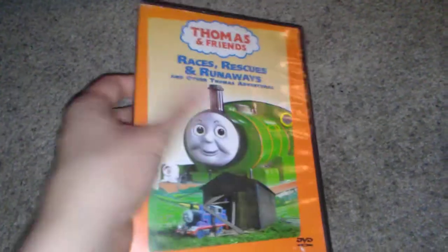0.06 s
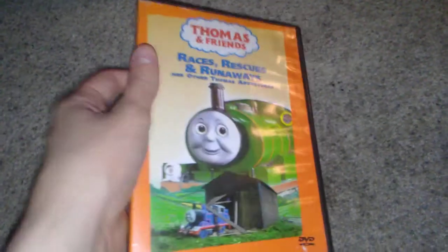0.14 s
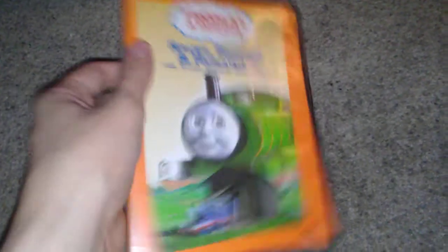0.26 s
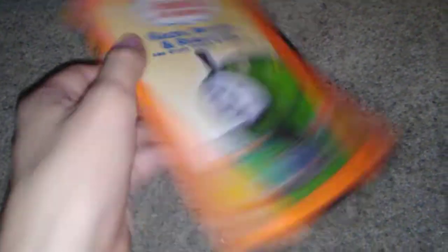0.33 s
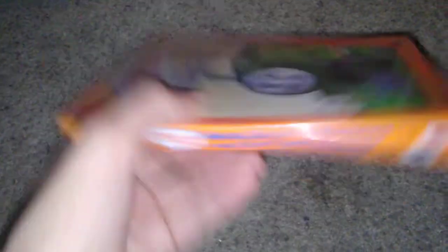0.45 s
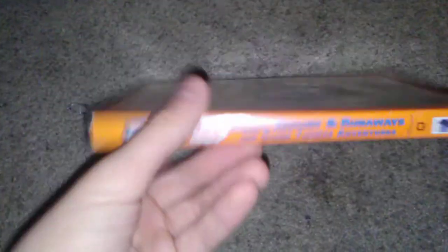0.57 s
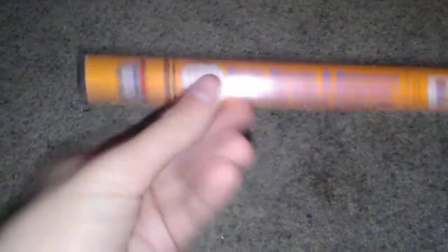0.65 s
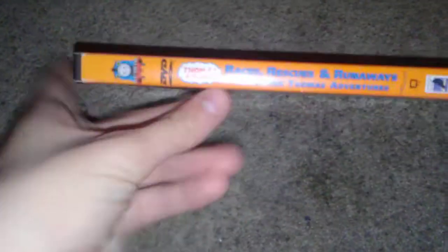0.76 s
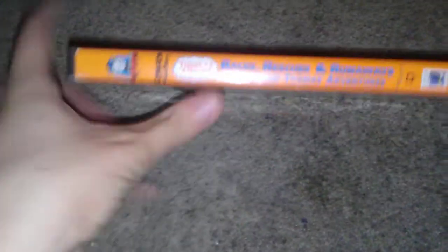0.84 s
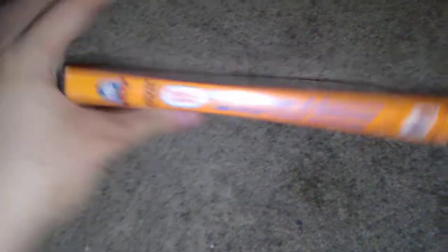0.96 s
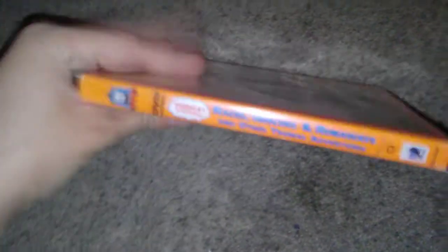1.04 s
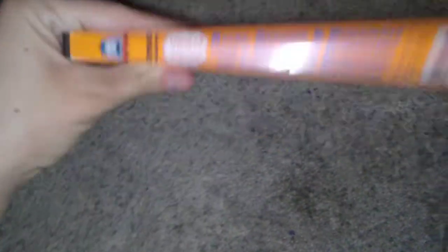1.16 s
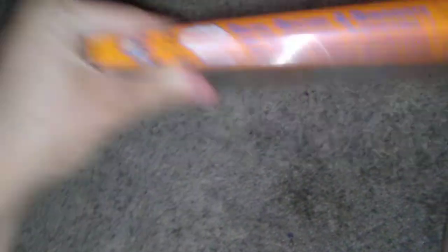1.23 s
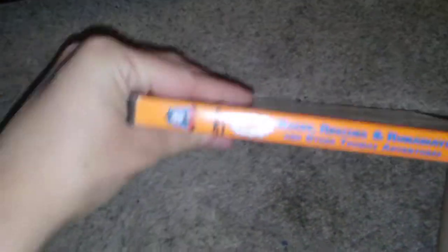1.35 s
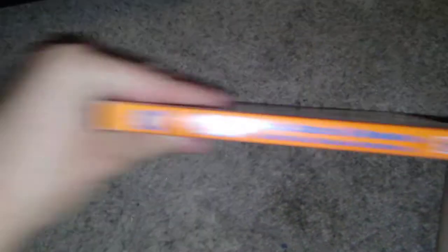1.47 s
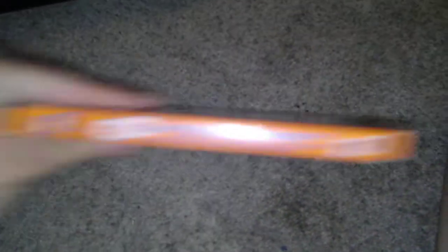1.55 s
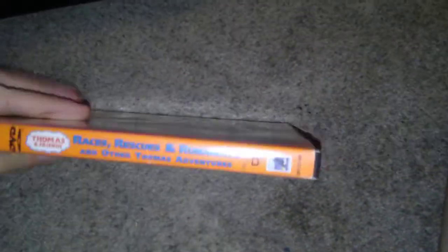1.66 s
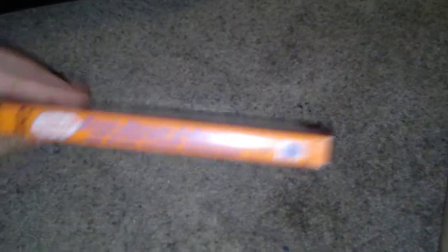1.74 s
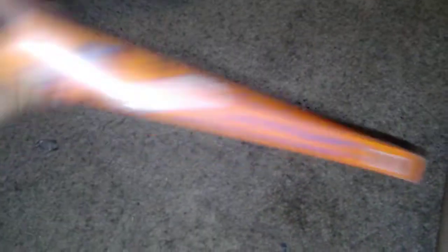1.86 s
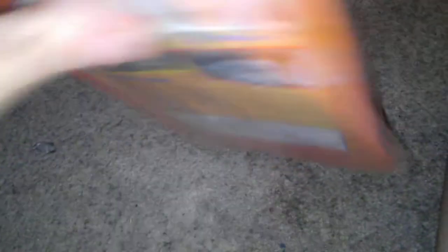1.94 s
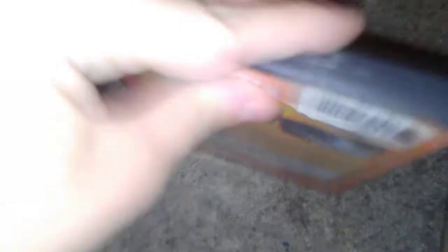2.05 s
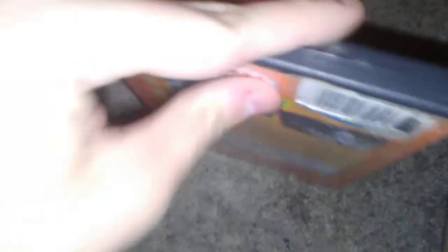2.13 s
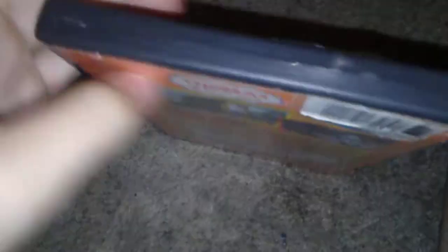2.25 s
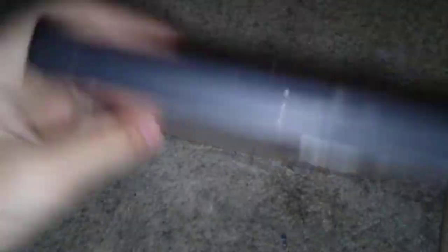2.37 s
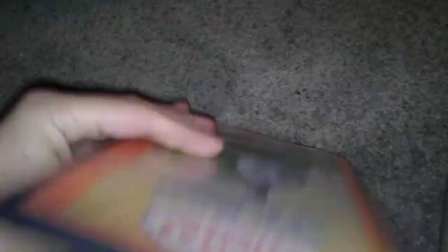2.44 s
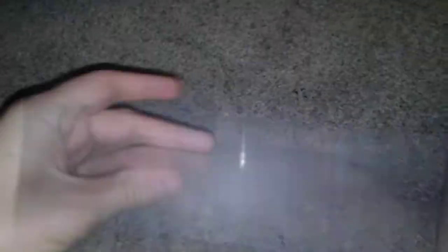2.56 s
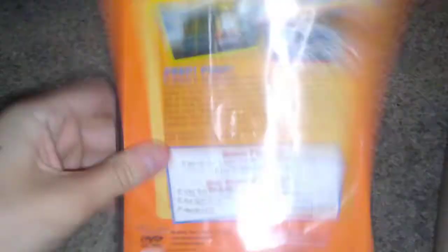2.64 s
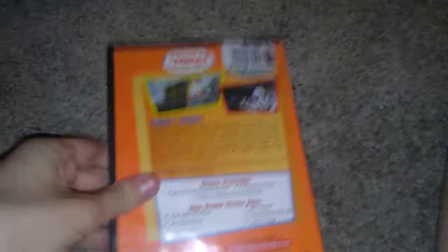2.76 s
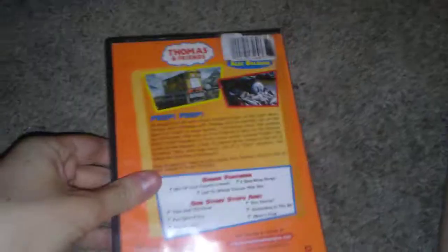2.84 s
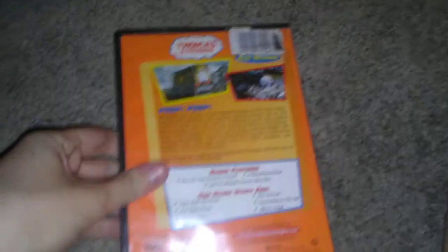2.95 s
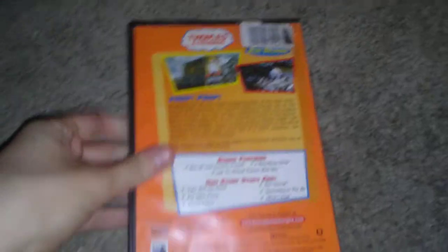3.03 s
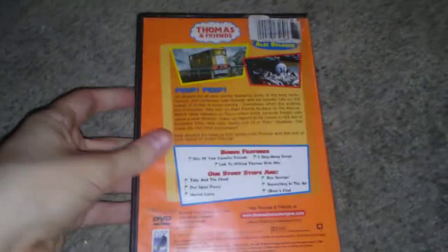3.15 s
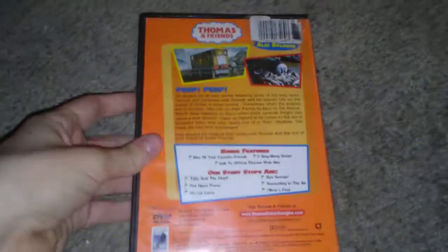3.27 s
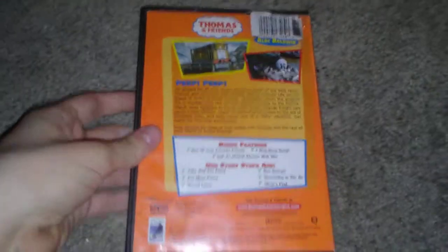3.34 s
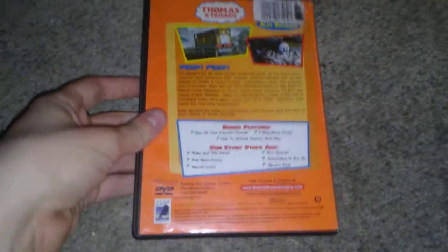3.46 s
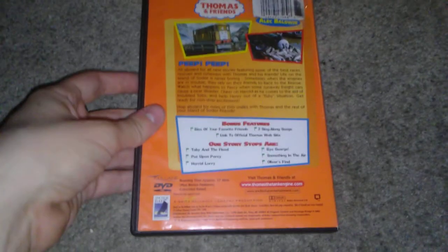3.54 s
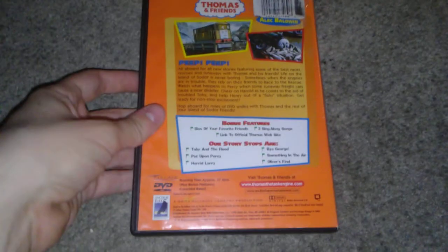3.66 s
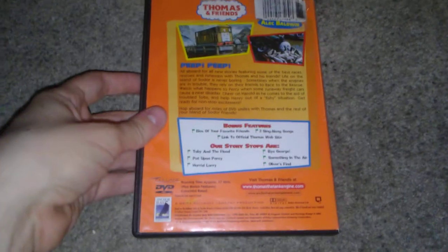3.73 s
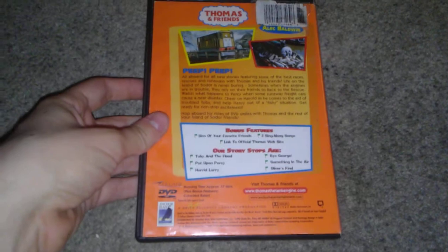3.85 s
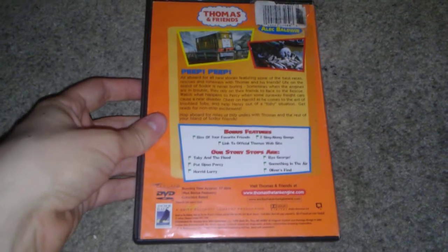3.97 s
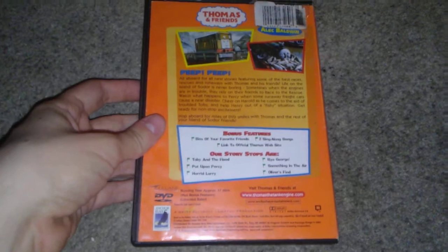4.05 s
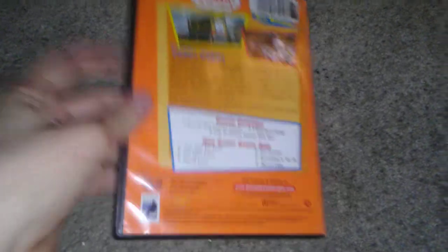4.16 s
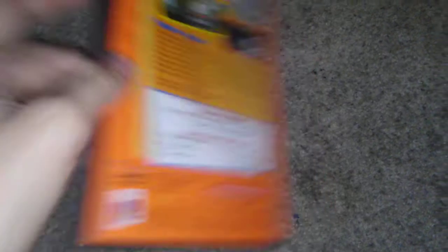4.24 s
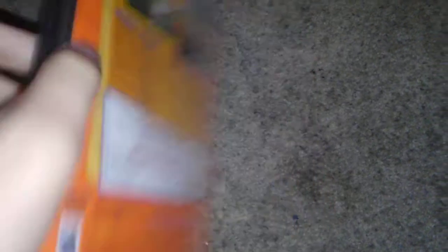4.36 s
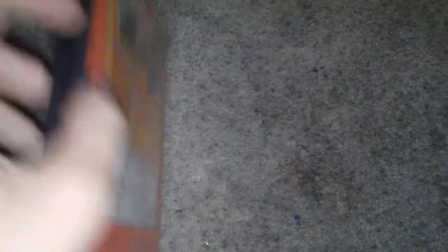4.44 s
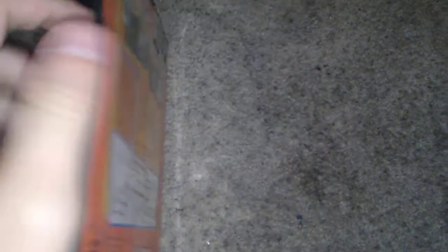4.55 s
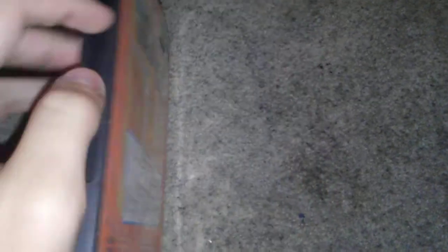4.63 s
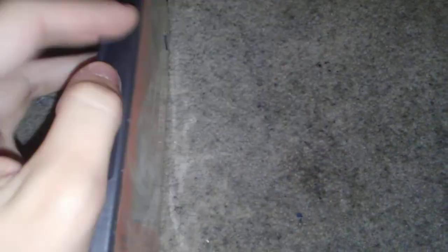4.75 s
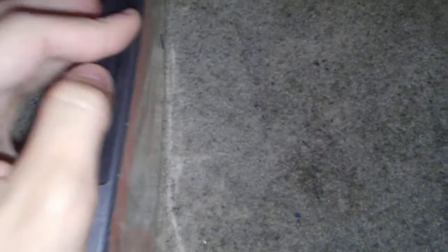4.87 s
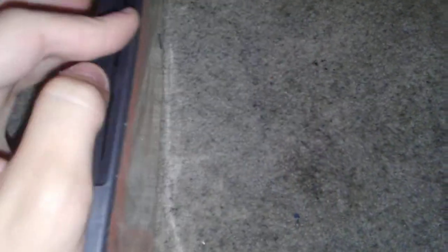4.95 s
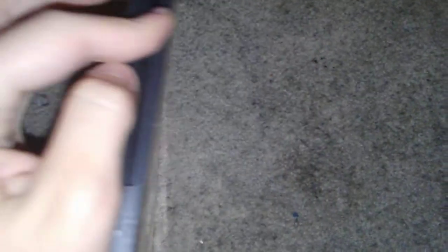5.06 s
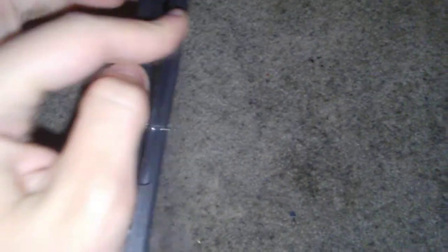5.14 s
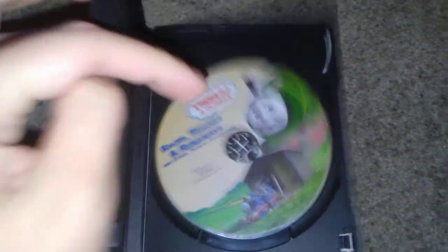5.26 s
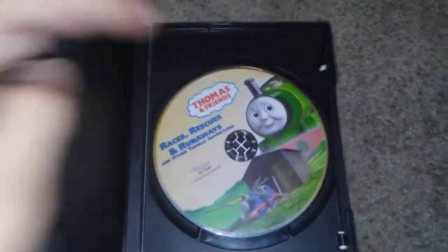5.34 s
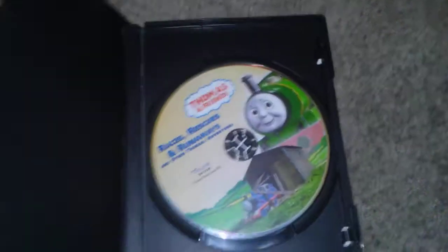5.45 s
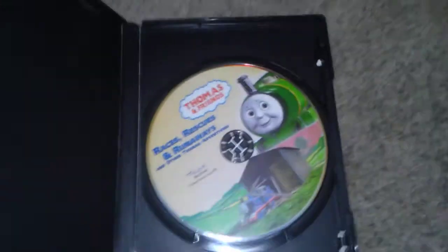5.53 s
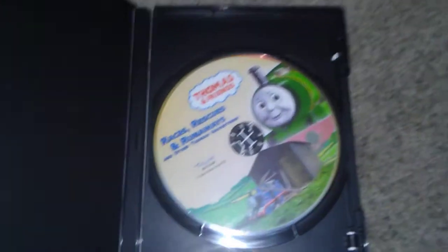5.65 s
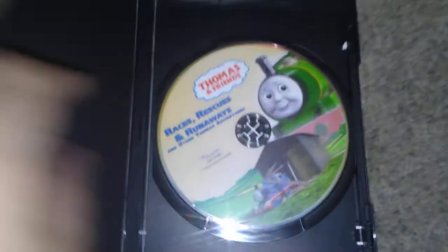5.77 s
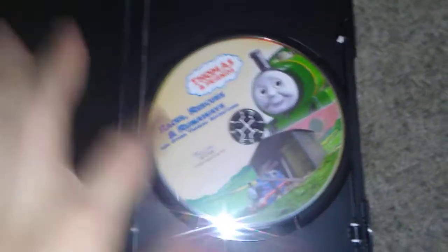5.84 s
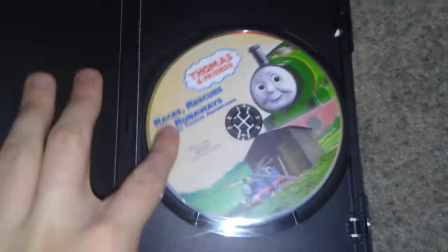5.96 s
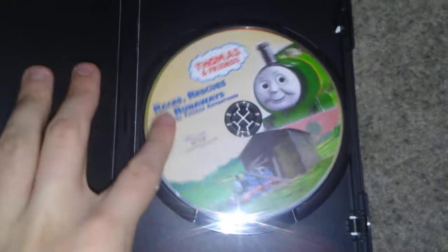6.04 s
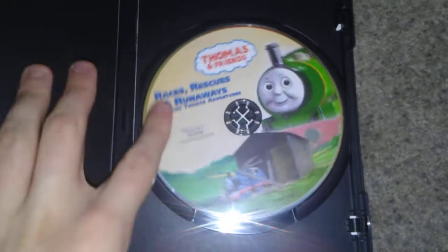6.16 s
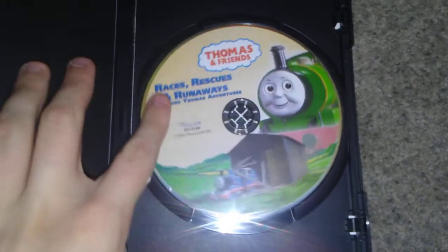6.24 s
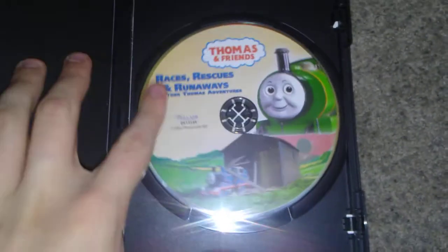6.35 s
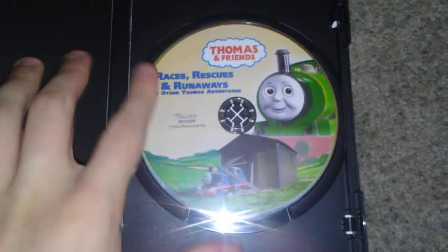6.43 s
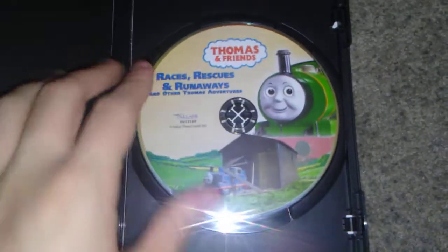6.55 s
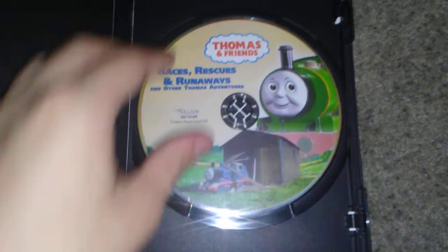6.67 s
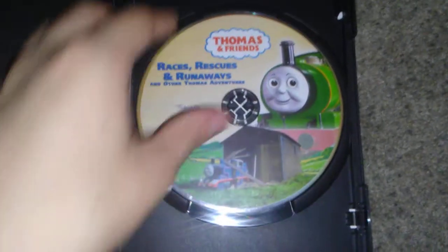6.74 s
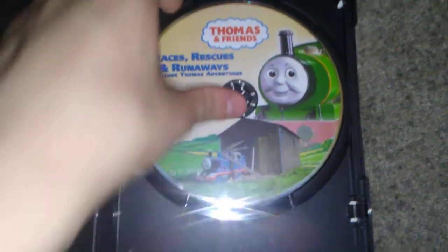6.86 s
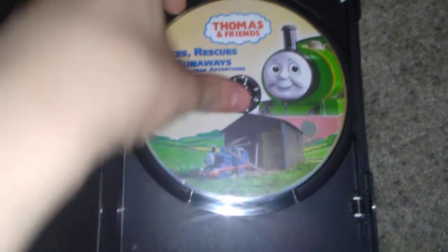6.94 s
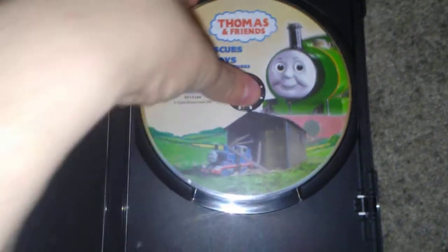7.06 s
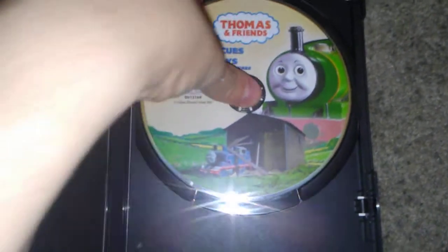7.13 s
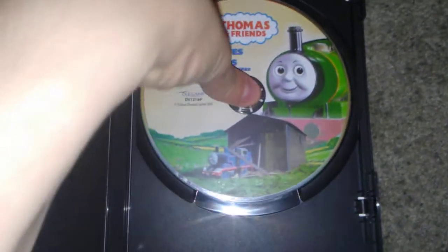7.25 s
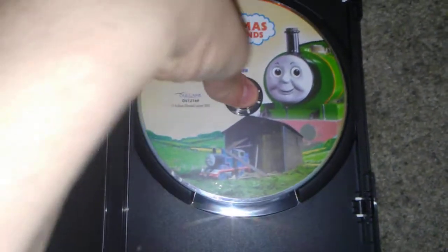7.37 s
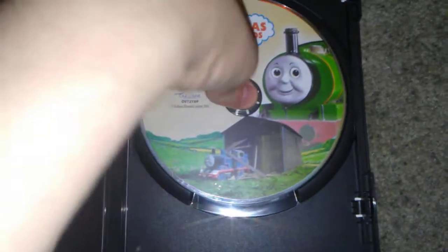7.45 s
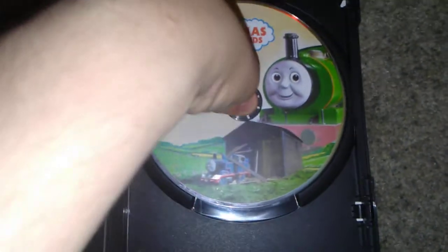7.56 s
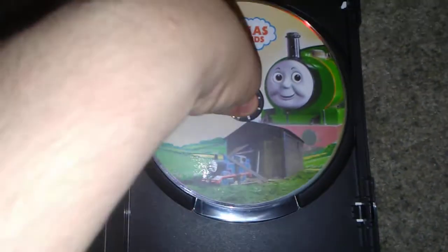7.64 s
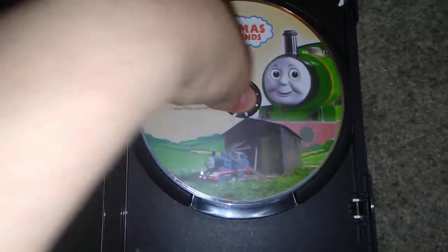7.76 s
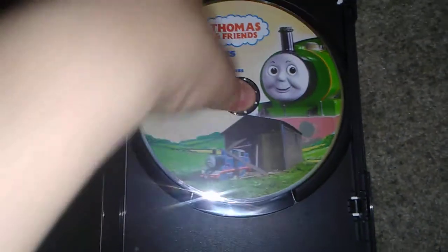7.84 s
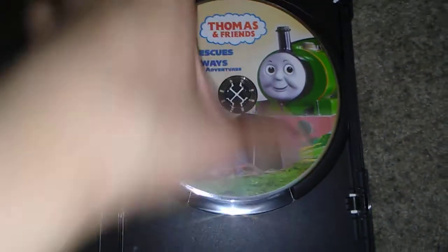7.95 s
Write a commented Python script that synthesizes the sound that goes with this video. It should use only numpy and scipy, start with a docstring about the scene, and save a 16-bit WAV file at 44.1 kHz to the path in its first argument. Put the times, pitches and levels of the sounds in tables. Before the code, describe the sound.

Close handling of a plastic disc case in a small carpeted room, through a small, dull microphone with a faint low noise floor. From 0 to 1.3 s, skin hisses over the glossy surface in uneven strokes, with scuffs and crackles around 0.5-0.7 and a brief dry creak near 0.75. A hard click with a low knock comes at 1.38, followed by a smooth palm scrape. Faster rubs and scuffs at 2.0-2.7 lead to a sharp clattering clack at 2.83 and crinkling film. A small click at 3.18, then near quiet until soft fumbling at 4.2-4.75. At 5.21 the latches snap open, the loudest moment, with rattling lid, knocks and disc taps dying away by 5.6. Faint ticks follow; a thumb rubs and crackles around 6.9-7.1. At 7.68 the hub gives a firm snap with a short knock, then small ticks to the end.

```python
"""Skin hisses softly over a plastic disc case, held close by and turned in one hand in a small carpeted room.
The skin catches in scuffs and a creak, made of tiny random slips driving the surface and the resonant shell.
The shell clicks and knocks, as noise bursts with ringing edges; the sleeve crinkles in high-passed ticks.
Then the latches snap open, the lid rattles and the disc taps its tray in dying runs of contacts.
A thumb rubs across the disc and presses the hub, which lets go with a snap and a few small ticks."""
import sys
import numpy as np
from scipy import signal
from scipy.fft import rfft, irfft
from scipy.io import wavfile
from scipy.ndimage import uniform_filter1d, minimum_filter1d

SR = 44100
rng = np.random.default_rng(int(sys.argv[2]) if len(sys.argv) > 2 else 0)


def digitize_waveform(pressure):
    """Quantize a signal to 16-bit integers and store it at the path in sys.argv[1].

    Rows of a 2-D input are taken as channels; values are limited to [-1, 1].
    """
    field = np.atleast_2d(pressure).T
    bounded = np.clip(field, -1, 1)
    quanta = np.round(bounded * 32767).astype(np.int16)
    wavfile.write(sys.argv[1], SR, quanta)


N = 352800
TIME = np.arange(N) / SR


def from_db(db):
    """Amplitude ratio of a level in dB."""
    return 10 ** (np.asarray(db) / 20)


def rms_one(x):
    """Scale a lasting sound to an RMS of one."""
    return x / np.sqrt(np.mean(x ** 2) + 1e-20)


def energy_one(x):
    """Scale a short sound to a total energy of one."""
    return x / np.sqrt(np.sum(x ** 2) + 1e-20)


def convolve(x, response):
    """Pass a sound through an impulse response, keeping its length."""
    return signal.fftconvolve(x, response)[:len(x)]


def high_pass(hz):
    """Second-order filter that thins a sound out below a frequency."""
    return signal.butter(2, hz, "high", fs=SR, output="sos")


def response(spectrum, resonances=(), size=4096):
    """Causal (minimum-phase) impulse response of a spectrum with resonant peaks on top."""
    hz = np.maximum(np.arange(size // 2 + 1) * SR / size, 1)
    points, levels = np.transpose(spectrum)
    db = np.interp(np.log(hz), np.log(points), levels)
    for centre, width, boost in resonances:
        db = db + boost / (1 + (2 * (hz - centre) / width) ** 2)
    # folding the cepstrum onto positive times makes the phase minimal
    cepstrum = irfft(np.log(from_db(db)))
    cepstrum[1:size // 2] *= 2
    cepstrum[size // 2 + 1:] = 0
    return irfft(np.exp(rfft(cepstrum)))


def add(track, s, sound):
    """Mix a sound in from a given time."""
    start = max(int(s * SR), 0)
    track[start:start + len(sound)] += sound[:max(N - start, 0)]


def grains(count, per_s, spread_db):
    """Tiny slips at random moments, of uneven size and either sign."""
    sizes = from_db(spread_db * np.minimum(rng.exponential(1, count), 4))
    sizes = sizes * rng.choice([-1, 1], count)
    happens = rng.random(count) < per_s / SR
    return rms_one(sizes * happens)


def waver(per_s):
    """Random unevenness: straight lines between random values that have a spread of one."""
    knots = np.arange(0, N / SR + 1, 1 / per_s)
    return np.interp(TIME, knots, rng.standard_normal(len(knots)))


def fade(t, t60, rise_s=0.0006):
    """A contact builds up in about a millisecond and dies away."""
    return (1 - np.exp(-t / rise_s)) * from_db(-60 * t / t60)


def burst(t, t60, colour):
    """A contact that chatters briefly, heard through the case."""
    return energy_one(convolve(rng.standard_normal(len(t)) * fade(t, t60), colour))


def ring(t, hz, t60):
    """One damped mode of the plastic."""
    return energy_one(np.sin(2 * np.pi * hz * t) * fade(t, t60))


# how long the plastic rings, longest at the disc's own note: (frequency [Hz], t60 [s])
RING_TIMES = [(3500, 0.03), (4050, 0.074), (4600, 0.013)]


def ping(t, hz):
    """A plastic edge rings in a cluster of close modes that the hand soon damps."""
    total = 0
    for ratio, size in [(1, 1), (0.94, 0.4), (1.07, 0.4)]:  # pitch ratio, amplitude
        t60 = np.interp(hz * ratio, *np.transpose(RING_TIMES))
        total = total + size * rng.choice([-1, 1]) * ring(t, hz * ratio, t60)
    return energy_one(total)


# resonances of the shell and the disc: (centre [Hz], width [Hz], boost [dB])
SHELL_MODES = [(118, 66, 5.5), (820, 200, 2), (1585, 180, 5), (3150, 280, 1), (4110, 98, 3),
               (5563, 330, 6.5), (6120, 640, -5.5)]


def touched_shell(spread_db=6.0, detune=0.058):
    """Each contact point and grip favours other resonances and shifts them a little."""
    chance = np.clip(rng.standard_normal((len(SHELL_MODES), 2)), -1, 1)
    return [(hz * np.exp(detune * shift), width, boost + spread_db * favour)
            for (hz, width, boost), (shift, favour) in zip(SHELL_MODES, chance)]


def travelling(force, spectrum, size=4096):
    """A moving contact excites the shell at a new spot about every twentieth of a second."""
    out, window = np.zeros(N), signal.windows.hann(size, sym=False)
    force = np.pad(force, (size // 2, size))
    for start in range(0, N, size // 2):
        spot = energy_one(response(spectrum, touched_shell(spread_db=1.5)))
        piece = signal.fftconvolve(force[start:start + size] * window, spot)
        add(out, (start + 0.5) / SR, piece)  # the half sample guards against rounding down
    return np.pad(out[size // 2:], (0, size // 2))


# strokes of the hand over the case: (time at the fastest [s], swell [s], fade [s],
# friction hiss level [dB], shell rumble relative to the hiss [dB])
HAND_STROKES = [(.07, 0.2, 0.19, -42, -7.5), (.43, 0.13, 0.13, -48.5, -3), (0.666, 0.2, 0.16, -40, 0),
                (1.104, 0.091, 0.1, -34.5, -5.5), (1.41, 0.064, 0.17, -48.5, 3),
                (2.07, 0.046, 0.089, -38.5, -8.5), (2.231, 0.033, 0.13, -39.5, -15),
                (2.399, 0.084, 0.24, -34, -16), (2.659, 0.089, 0.1, -35, -11.5),
                (2.867, 0.041, 0.098, -43.5, 7.5), (3.151, 0.129, 0.094, -43.5, -8),
                (4.4, 0.35, 0.7, -56.5, -11), (5.39, 0.096, 0.32, -44, -9),
                (6.926, 0.087, 0.1, -44.5, -6.5), (7.07, 0.069, 0.13, -54.5, -1.5)]


def rubbing(rest_hiss_db=-79, rest_rumble_db=-79, drop_db=20.5, roundness=1.27):
    """Strength of hiss and rumble: each stroke gathers speed, peaks and slows, over a resting grip."""
    # drop_db is the fall over one swell or fade; a roundness of 1 is a pointed stroke, 2 a round one
    hiss, rumble = from_db(rest_hiss_db) ** 2, from_db(rest_rumble_db) ** 2
    for s, swell, slowing, level, shell in HAND_STROKES:
        away = np.maximum((s - TIME) / swell, (TIME - s) / slowing)
        power = from_db(level - drop_db * np.minimum(away, 10) ** roundness) ** 2
        hiss = hiss + power
        rumble = rumble + power * from_db(shell) ** 2
    return np.sqrt(hiss), np.sqrt(rumble)


# colour of skin on the glossy surface: (frequency [Hz], level [dB per Hz])
HISS_COLOUR = [(500, -37.5), (1300, -25), (2100, 0), (2800, 2.5), (4500, -5), (6000, -1), (9000, -2.5),
               (16000, -7.5)]
# colour of the shaken shell and tray: (frequency [Hz], level [dB per Hz])
RUMBLE_COLOUR = [(25, -27), (65, -0.5), (200, 2.5), (370, 2.5), (520, -10), (760, -0.5), (1200, -10.5),
                 (2500, -21.5), (6000, -46.5)]


def slide(hiss, rumble, slips_per_s=8000, uneven_db=2.5):
    """Dense tiny slips of skin on the glossy sleeve; a firm grip that shakes the shell also catches and crackles."""
    catches = grains(N, per_s=140, spread_db=2.0)
    slips = grains(N, slips_per_s, spread_db=0.5)
    friction = rms_one(slips * from_db(uneven_db * waver(per_s=110)))
    surface = travelling(friction * hiss + catches * rumble, HISS_COLOUR)
    shell = travelling(rms_one(friction + catches) * rumble, RUMBLE_COLOUR)
    return surface + shell


# colour of a crack or scrape: (frequency [Hz], level [dB per Hz])
CRACK_COLOUR = [(500, -34.5), (1200, -23.5), (2000, 1.5), (3000, 4), (4500, -4.5), (6500, -2), (9000, -5.5),
                (16000, -19)]
# skin catching on the case in short stick-slip scuffs, and at 7.675 s the brief first crack of the hub # snap:
# (time [s], length [s], level [dB], shell relative to the level, before shell_db is added [dB])
SKIN_SCUFFS = [(0.24, 0.022, -44.5, 4.5), (0.522, 0.025, -32.5, 0), (0.572, 0.054, -33, 5),
               (.59, .013, -22.5, 1.5), (0.645, 0.015, -34.5, 3), (0.68, 0.024, -33.5, 6),
               (1.355, 0.019, -42.5, 2.5), (2.021, 0.04, -39, 0), (2.127, 0.049, -36.5, 0.5),
               (2.174, 0.022, -35, 1.5), (4.242, 0.034, -49.5, -14.5), (4.43, 0.022, -43, -25),
               (4.516, 0.028, -37.5, 2), (4.588, 0.018, -41, -1.5), (4.711, 0.015, -37.5, -7),
               (5.33, 0.01, -28, -5), (5.729, 0.018, -45.5, -3.5), (5.955, 0.027, -50.5, 3),
               (7.303, 0.04, -61, 7.5), (7.6746, 0.0077, -27.5, 10), (7.861, 0.019, -41, 7)]


def scuffs(shell_db=-5.0, lowest_hz=135):
    """Uneven quick jerks of skin, or of the straining hub, drive the surface and the shell, whose deepest sway
    the grip damps."""
    out, t = np.zeros(N), TIME[:SR // 5]
    gripped = high_pass(lowest_hz)
    for s, length, level, shell in SKIN_SCUFFS:
        scrape = response(CRACK_COLOUR, touched_shell())
        rumble = signal.sosfilt(gripped, response(RUMBLE_COLOUR, touched_shell()))
        stroke = np.sqrt(np.maximum(np.sin(np.pi * np.minimum(t / length, 1)), 0))
        slips = stroke * grains(len(t), per_s=1200, spread_db=2.5)
        sound = energy_one(convolve(slips, scrape))
        sound += from_db(shell + shell_db) * energy_one(convolve(slips, rumble))
        add(out, s, from_db(level) * np.sqrt(length * SR) * sound)
    return out


# modes of the tapped disc: (frequency [Hz], level before a random change per tap [dB])
DISC_MODES = [(2430, 0.5), (3050, -4.5), (5650, -11.5)]
# the disc shifts on its hub and taps the tray: (time [s], level [dB])
DISC_TAPS = [(.514, -34), (1.809, -45.5), (1.901, -50), (2.387, -33.5), (2.735, -31.5), (4.191, -47.5),
             (4.55, -36), (5.265, -25), (5.673, -56.5), (5.976, -39.5), (6.413, -53.5), (6.497, -51.5),
             (6.524, -50), (6.542, -53.5), (6.57, -54), (6.88, -46.5), (6.918, -40), (6.942, -37),
             (6.974, -40.5), (7.347, -51.5), (7.446, -43), (7.838, -44.5), (7.933, -39), (7.951, -34.5)]


def taps(crack_t60=0.02, crack_db=-2.5, knock_db=-9.5, spread_db=6.5, contact_s=0.0068):
    """A light tap chatters, knocks and rings the disc's modes in a new mix; gives cracks and rings apart."""
    cracks, rings, t = np.zeros(N), np.zeros(N), TIME[:SR // 25]
    tray = response(RUMBLE_COLOUR)
    for s, level in DISC_TAPS + disc_rocking() + crackle():
        modes = sum(from_db(db + spread_db * rng.standard_normal()) * ping(t, hz) for hz, db in DISC_MODES)
        noise = from_db(crack_db) * burst(t, crack_t60, response(CRACK_COLOUR, touched_shell()))
        noise += from_db(knock_db) * burst(t, crack_t60, tray)
        strength = from_db(level) * np.sqrt(contact_s * SR / 2)
        add(cracks, s, strength * noise)
        add(rings, s, strength * energy_one(modes))
    return cracks, rings


# the plastic crackles in the grip, after the case springs open and under the thumb:
# (time [s], length [s], level the run falls from [dB])
CRACKLE_RUNS = [(0.597, .13, -35.5), (5.308, .3, -36.5), (6.905, 0.28, -44.5)]


def crackle(count=15, fall_db=11.5):
    """Strained plastic settles in small taps at uneven moments, on the whole weaker, as (time, level)."""
    run = []
    for s, length, level in CRACKLE_RUNS:
        progress = (np.arange(count) + rng.random(count)) / count
        levels = level - fall_db * (progress + rng.random(count) / 2)
        run += zip(s + length * progress, levels)
    return run


# dull bumps of the flexing case: (time [s], level [dB], pitch [Hz])
PANEL_BUMPS = [(.609, -47, 760), (1.373, -28, 216), (2.134, -40, 290), (2.668, -34.5, 304),
               (2.745, -42.5, 213), (2.849, -23, 281), (2.867, -32, 740), (4.524, -38.5, 190),
               (5.221, -29.5, 73), (5.339, -26.5, 197), (5.975, -45.5, 364), (7.678, -23, 1990),
               (7.6791, -24, 970), (7.68, -25, 134)]


def bumps(contact_s=0.038, cycles=5.5):
    """A whole panel flexes: it swings up within a cycle and the hand damps it after a few more."""
    out, t = np.zeros(N), TIME[:SR // 5]
    for s, level, hz in PANEL_BUMPS:
        swing = energy_one(ring(t, hz, cycles / hz) * (1 - np.exp(-2 * hz * t)))
        add(out, s, from_db(level) * np.sqrt(contact_s * SR) * swing)
    return out


# modes of the creaking spine: (frequency [Hz], level [dB], t60 [s])
SPINE_MODES = [(5800, 2, 0.0028), (1660, -5, 0.077)]
# a finger creaks to a stop on the spine: (time [s], slip rate before jitter [per s],
# level before slip_db is added [dB])
FINGER_CREAK = [(0.736, 71, -33), (0.762, 180, -48), (0.802, 170, -51)]


def creak(jitter=0.4, slip_db=18.5):
    """Slips at jittered intervals ping the modes of the spine."""
    out, t = np.zeros(N), TIME[:SR // 10]
    times, per_s, level = np.transpose(FINGER_CREAK)
    slip = sum(from_db(db) * ring(t, hz, t60) for hz, db, t60 in SPINE_MODES)
    s = times[0]
    while s < times[-1]:
        add(out, s, from_db(np.interp(s, times, level) + slip_db) * slip)
        s += np.exp(jitter * rng.standard_normal()) / np.interp(s, times, per_s)
    return out


# colour of the knocking panels: (frequency [Hz], level [dB per Hz])
KNOCK_COLOUR = [(35, -19.5), (110, -1), (330, 2.5), (500, -8), (800, -5.5), (1300, -7.5), (4000, -30.5)]
# plastic clicks and snaps: (time [s], level [dB], ring [Hz], brightness [dB], panel knock [dB]);
# the last two are relative to the level, before bright_db and knock_db are added
SHELL_CLICKS = [(1.3713, -29, 3330, -20, 5.5), (1.3789, -13.5, 2870, -42, -9.5),
                (1.38, -19, 4140, -26, -15.5), (2.824, -10.5, 2840, -3.5, -1),
                (2.827, -14.5, 2620, -7.5, -4), (2.8343, -15.5, 2080, -4.5, -4.5),
                (2.848, -12, 4160, -4, -5.5), (3.184, -23, 3810, 1, -33), (5.21, -4.5, 3040, 2, -14),
                (5.219, -3, 2735, -2, -7), (5.3396, -17, 2510, -23.5, -3.5),
                (5.358, -19.5, 2950, -30.5, -13), (5.4138, -26.5, 6160, 16, -3),
                (7.6795, -10, 4020, -9.5, -5), (7.6857, -20.5, 4020, -8, -21), (7.6963, -33, 2960, -6.5, 1),
                (7.849, -30, 3990, 0, -19)]


def clicks(crack_t60=0.016, knock_t60=0.033, ring_db=-5.0, bright_hz=4700, bright_db=6.0,
           knock_db=-1.5, contact_s=0.0031):
    """Each release cracks, shakes the panels and leaves an edge ringing; gives cracks and rings apart."""
    cracks, rings, t = np.zeros(N), np.zeros(N), TIME[:SR // 10]
    below = signal.butter(2, bright_hz, "low", fs=SR, output="sos")
    above = high_pass(bright_hz)
    for s, level, hz, brightness, panel in SHELL_CLICKS + lid_rattle():
        crack = response(CRACK_COLOUR, touched_shell())
        knock = response(KNOCK_COLOUR, touched_shell())
        dull = energy_one(signal.sosfilt(below, burst(t, crack_t60, crack)))
        sharp = energy_one(signal.sosfilt(above, burst(t, crack_t60, crack)))
        sound = energy_one(dull + from_db(brightness + bright_db) * sharp)
        sound += from_db(panel + knock_db) * burst(t, knock_t60, knock)
        strength = from_db(level) * np.sqrt(contact_s * SR)
        add(cracks, s, strength * sound)
        add(rings, s, strength * from_db(ring_db) * ping(t, hz))
    return cracks, rings


# smooth sweeps of the palm over the sleeve or the disc: (time [s], length [s], level [dB],
# low cut of the surface scrape [Hz])
PALM_SWEEPS = [(1.459, 0.29, -35.5, 905), (1.729, 0.32, -57, 1820), (3.269, 0.38, -61, 1990),
               (6.661, .2, -51.5, 4500)]


def sweeps(shell_db=-16.5):
    """The palm glides in a fine-grained scrape that ends as it lifts; each low cut sets its own thinness."""
    out = np.zeros(N)
    for s, length, level, low_hz in PALM_SWEEPS:
        count = int(length * SR)
        slips = grains(count, per_s=5000, spread_db=2.0)
        scrape = convolve(slips, response(CRACK_COLOUR, SHELL_MODES))
        surface = rms_one(signal.sosfilt(high_pass(low_hz), scrape))
        shell = rms_one(convolve(slips, response(RUMBLE_COLOUR, SHELL_MODES)))
        glide = np.sin(np.linspace(0, np.pi, count))
        add(out, s, from_db(level) * glide * (surface + from_db(shell_db) * shell))
    return out


# the clear film of the sleeve crinkles: (time [s], level [dB])
FILM_CRINKLES = [(2.862, -24.5), (2.885, -31.5), (2.923, -51), (2.949, -44), (3.001, -51.5), (3.032, -46),
                 (4.403, -45.5), (4.703, -44.5), (4.754, -48), (5.63, -52.5), (7.898, -40)]


def crinkles(film_hz=5000, t60=0.0096):
    """The thin film buckles with a short, bright tick."""
    out, t = np.zeros(N), TIME[:SR // 15]
    thin = high_pass(film_hz)
    for s, level in FILM_CRINKLES:
        tick = signal.sosfilt(thin, burst(t, t60, response(CRACK_COLOUR, touched_shell())))
        add(out, s, from_db(level) * np.sqrt(t60 * SR) * energy_one(tick))
    return out


def lid_rattle(count=4, start_s=5.2316, gap_s=0.02, slowing=1.1, first_db=-11.5, loss_db=2,
               middle_hz=3300, pitch_spread=0.15, bright_db=-7.5, knock_db=-11.5):
    """The freed lid chatters on the latches: contacts weaken and land on other spots, and the gaps grow."""
    pitches = middle_hz * np.exp(pitch_spread * rng.standard_normal(count))
    times = start_s + gap_s * np.cumsum([0, *slowing ** np.arange(count - 1)])
    return [(times[k], first_db - loss_db * k, pitches[k], bright_db, knock_db) for k in range(count)]


def disc_rocking(count=6, start_s=5.373, gap_s=0.0408, first_db=-34.5, loss_db=2.5):
    """The jolted disc rocks on its hub and taps its tray evenly, ever weaker, until it settles."""
    return [(start_s + gap_s * k, first_db - loss_db * k) for k in range(count)]


def room(x, early_db=-14.0, early_t60=0.15, late_db=-33, late_t60=0.25, first_echo_s=0.0041):
    """Dense, quickly dying reflections from nearby surfaces and a faint longer tail."""
    t = TIME[:SR // 2]
    echoes = rng.standard_normal(len(t)) * (t > first_echo_s)
    early = energy_one(echoes * from_db(-60 * t / early_t60))
    late = energy_one(echoes * from_db(-60 * t / late_t60))
    return x + convolve(x, from_db(early_db) * early + from_db(late_db) * late)


def scene():
    """All the handling noises in the room; the thin edges ring too locally to fill it."""
    hiss, rumble = rubbing()
    cracks, rings = np.add(clicks(), taps())
    skin = slide(hiss, rumble) + scuffs() + sweeps() + creak()
    plastic = cracks + bumps() + crinkles()
    return (room(skin + plastic) + rings)[None]


def limiter(x, size=17):
    """The gain dips for under a millisecond around any peak above full scale."""
    gain = 1 / np.maximum(np.abs(x), 1)
    return x * uniform_filter1d(minimum_filter1d(gain, size), size)


# response of the small microphone: (frequency [Hz], gain [dB])
MICROPHONE_RESPONSE = [(20, -6), (6200, 3), (7000, -8), (8000, -17), (9500, -27), (15000, -22)]
# colour of the steady noise floor: (frequency [Hz], level [dB per Hz])
FLOOR_COLOUR = [(30, -33), (55, -3.5), (115, 2), (200, -4.5), (1400, -21.5), (9000, -26), (15000, -24)]


def record(dry, floor_db=-66, cutoff_hz=16000):
    """A small microphone, dull above 7 kHz, over a steady noise floor; peaks above full scale are limited."""
    heard = convolve(dry[0], response(MICROPHONE_RESPONSE))
    floor = convolve(rng.standard_normal(N), response(FLOOR_COLOUR))
    heard += from_db(floor_db) * rms_one(floor)
    low_pass = signal.ellip(10, 0.1, 80, cutoff_hz, fs=SR, output="sos")
    return limiter(signal.sosfilt(low_pass, heard))[None]


dry = scene()
out = record(dry)
digitize_waveform(out)
```